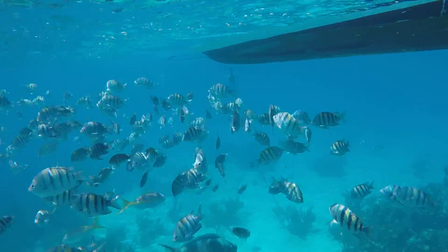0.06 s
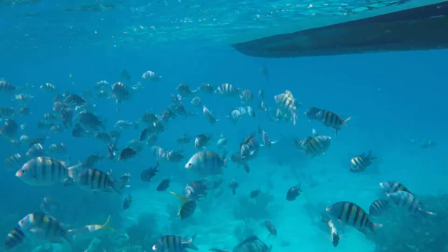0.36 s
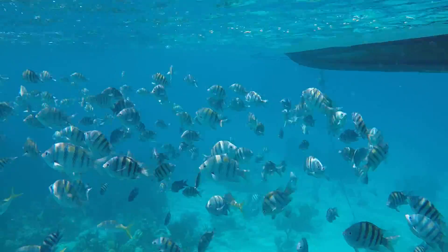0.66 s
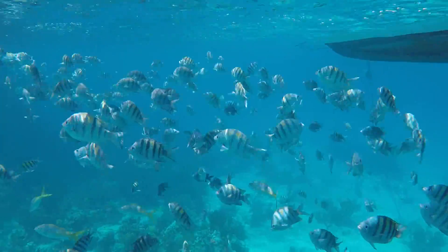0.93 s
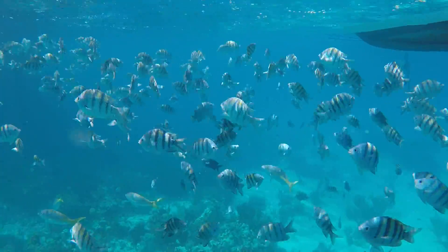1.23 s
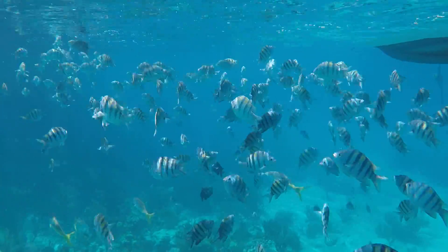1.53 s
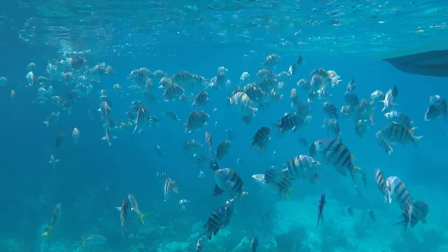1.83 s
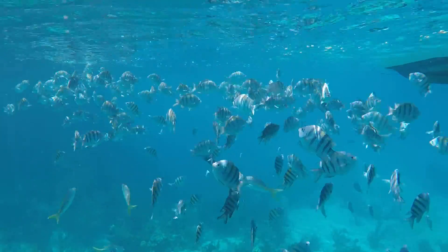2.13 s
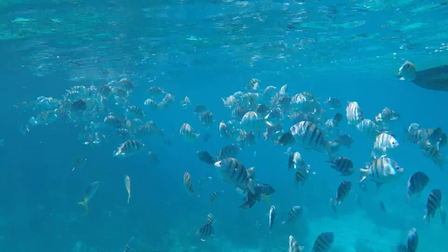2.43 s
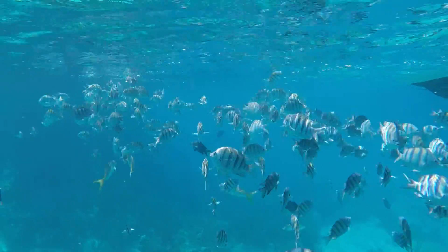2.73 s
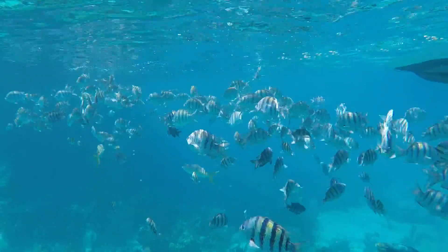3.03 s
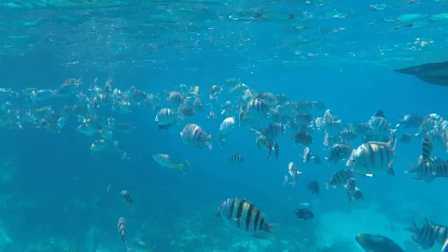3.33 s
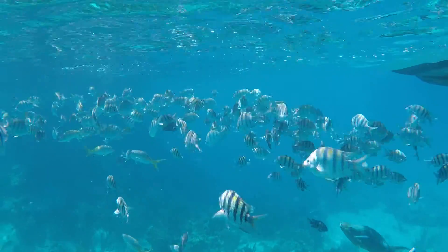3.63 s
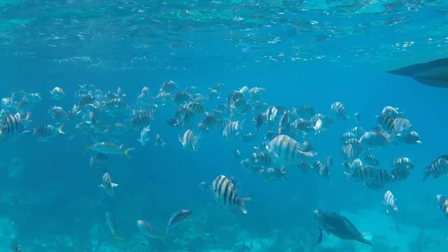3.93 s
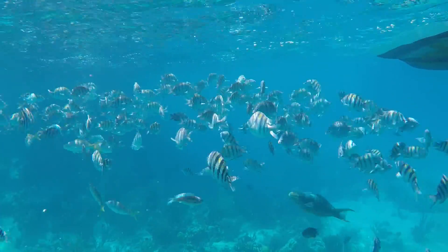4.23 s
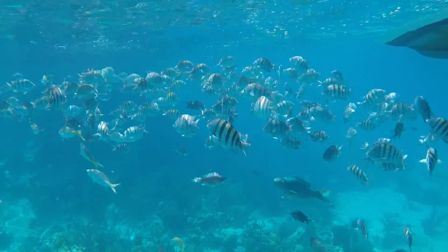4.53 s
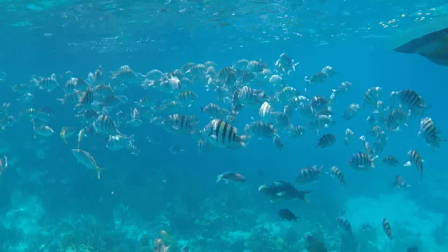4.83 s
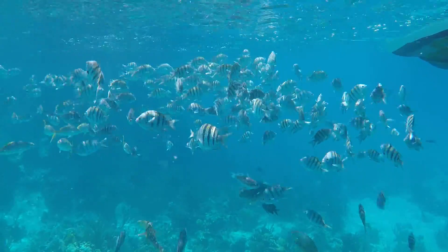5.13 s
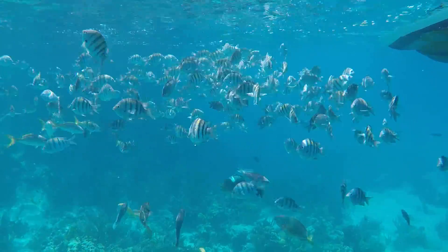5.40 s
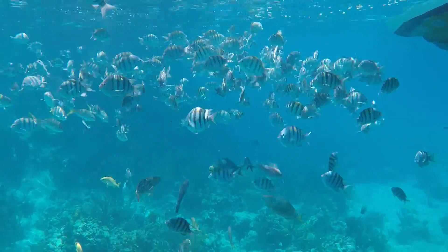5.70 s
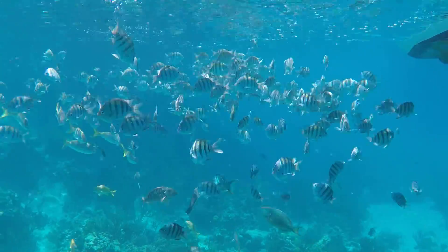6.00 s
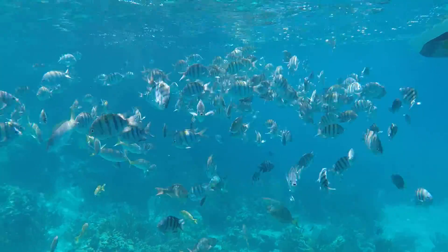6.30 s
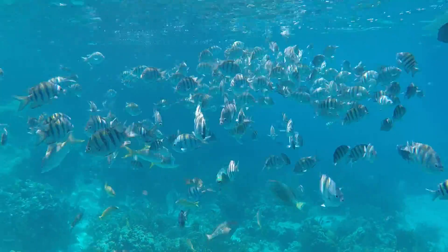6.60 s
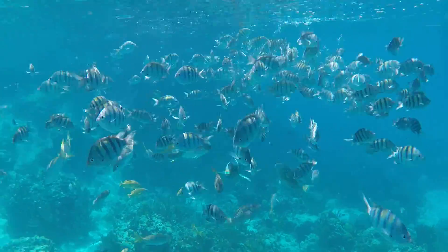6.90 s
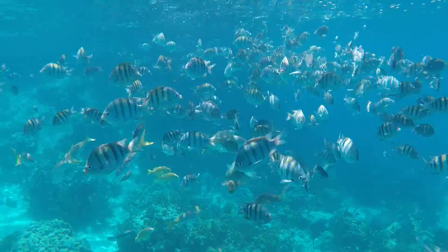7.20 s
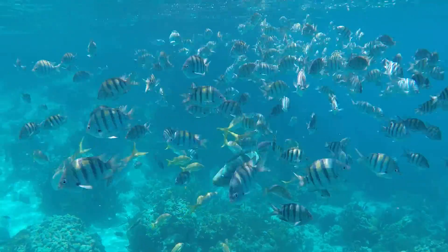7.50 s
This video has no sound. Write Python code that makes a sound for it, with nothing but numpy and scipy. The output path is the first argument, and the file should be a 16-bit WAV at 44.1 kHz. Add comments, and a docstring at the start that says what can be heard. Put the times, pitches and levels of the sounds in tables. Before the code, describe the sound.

Underwater at a coral reef, snapping shrimp crackle all around, with a few sharp clicks close by, over faint slosh and a low rumble. Short, high, fluttering squeaks come three to four a second in three runs, the last one longest and loudest. A few bubbles plop, two of them clearly, and small knocks and scuffs bump the waterproof housing around the microphone.

```python
"""Coral reef under water

Heard through a camera's waterproof housing. Snapping shrimp crackle all around, a few close by, as their
cavities collapse. Bubbles plop; small knocks and scuffs ring the housing. Runs of short fluttering
squeaks, like air forced through a wet seal, sound over slosh and a low rumble."""
import sys
import numpy as np
from scipy import signal
from scipy.fft import rfft, irfft
from scipy.io import wavfile

SR = 44100
rng = np.random.default_rng(int(sys.argv[2]) if len(sys.argv) > 2 else 0)


def transcribe(signal):
    """Save signal, clipped to [-1, 1], as a 16-bit WAV file at the path in sys.argv[1]."""
    frames = np.atleast_2d(signal).T
    limited = np.clip(frames, -1, 1)
    pcm = np.round(limited * 32767).astype(np.int16)
    wavfile.write(sys.argv[1], SR, pcm)


N = 332955


def amp(db):
    """Decibels to gain."""
    return 10 ** (np.asarray(db) / 20)


def unit(x):
    """Scale to rms 1."""
    return x / np.sqrt(np.mean(x ** 2) + 1e-20)


def spread_over(x, seconds):
    """Scale to the energy of rms 1 held for that long."""
    return x * np.sqrt(seconds * SR / np.sum(x ** 2))


def spectrum_db(points, hz):
    """Interpolate (freq_hz, level_db) points on a log-frequency axis."""
    freq_hz, level_db = np.transpose(points)
    return np.interp(np.log(hz + 1), np.log(freq_hz), level_db)


def curve_db(points):
    """Interpolate (time_s, level_db) points at every sample."""
    return np.interp(np.arange(N) / SR, *np.transpose(points))


def add(mix, start_s, sound):
    """Mix a sound in at start_s."""
    part = mix[max(round(start_s * SR), 0):][:len(sound)]
    part += sound[:len(part)]


def noise(colour):
    """Steady noise with the given spectrum, rms 1."""
    gain = amp(spectrum_db(colour, np.fft.rfftfreq(N, 1 / SR)))
    return unit(irfft(rfft(rng.standard_normal(N)) * gain, N))


def swells(rate_hz):
    """Scene-long slow random motion, rms 1."""
    hz = np.fft.rfftfreq(N, 1 / SR)
    return unit(irfft(rfft(rng.standard_normal(N)) * np.exp(-(hz / rate_hz) ** 2), N))


def wobble(rate_hz, size):
    """Short random wavering, rms about 1."""
    lowpass = signal.butter(2, rate_hz, fs=SR, output="sos")
    return unit(signal.sosfilt(lowpass, rng.standard_normal(SR // 2)))[-size:]


def scattered(per_s, values):
    """One random time per equal slot, each with that many random values in 0..1."""
    draws = rng.random((int(per_s * N / SR) + 1, 1 + values))
    return [((slot + place) / per_s, *rest) for slot, (place, *rest) in enumerate(draws)]


# Rumble spectrum: freq_hz, density_db
RUMBLE_SPECTRUM = [(8, -4.5), (22, 5.5), (40, 0), (62, -3.5), (80, -11.5), (130, -21.5), (300, -50)]
# Rumble envelope: time_s, level_db
RUMBLE_ENVELOPE = [(0.0, -51.5), (0.6, -52), (1.15, -54), (2.4, -55), (2.8, -50), (3.15, -58.5),
                   (3.45, -55), (3.7, -56.5), (5.74, -56), (6.04, -52.5), (7.54, -54.5)]


def rumble(eddies_db, gain_db=2.5):
    """Moving water rumbles, swelling with the eddies."""
    return amp(curve_db(RUMBLE_ENVELOPE) + gain_db + eddies_db) * noise(RUMBLE_SPECTRUM)


# Slosh spectrum: freq_hz, density_db
SLOSH_SPECTRUM = [(90, 1.5), (180, 4.5), (300, -3.5), (450, 2), (620, -2), (800, -26.5), (1150, -43.5)]
# Slosh envelope: time_s, level_db
SLOSH_ENVELOPE = [(0.0, -70.5), (1.14, -59), (1.58, -69), (2.54, -69), (2.88, -70.5), (3.43, -60.5),
                  (3.85, -69), (5.25, -67), (5.59, -58.5), (6.08, -61.5), (6.25, -63.5), (7.55, -71)]


def slosh(eddies_db, gurgle_db=3):
    """The surface sloshes with the eddies and gurgles on top."""
    level_db = curve_db(SLOSH_ENVELOPE) + eddies_db / 2 + gurgle_db * swells(rate_hz=20)
    return amp(level_db) * noise(SLOSH_SPECTRUM)


# Far reef spectrum: freq_hz, density_db
WASH_SPECTRUM = [(90, -6.5), (160, -3.5), (320, -10), (500, -11), (635, 3.5), (760, -7), (1150, -15.5),
                 (1580, -10.5), (2200, -19), (3800, -13), (6400, -26.5), (9700, -18.5), (11200, -25.5),
                 (15000, -29)]


def reef_wash(level_db=-63.5, shimmer_db=3):
    """The farthest snaps merge into a restless wash."""
    return amp(level_db + shimmer_db * swells(rate_hz=44)) * noise(WASH_SPECTRUM)


# Snap spectrum through the housing: freq_hz, gain_db
SNAP_SPECTRUM = [(150, -75), (620, -11), (900, -12), (1100, -27), (1300, -15.5), (1540, 6.5), (1720, -0.5),
                 (1900, 4.5), (3000, -0.5), (5600, -8.5), (6500, -16), (9500, -18), (11200, -22.5),
                 (13500, -19)]


def snap(tilt, ring_hz=3000, ring_db=0, ring_octaves=0.15, scatter_db=-5, scatter_t60_s=0.011,
         tail_db=-11, tail_t60_s=0.074, tail_hz=4200, size=4096):
    """A cavity collapses: ringing crack, quick echoes off surface and housing, dull tail from the reef."""
    hz, t = np.fft.rfftfreq(size, 1 / SR), np.arange(size) / SR
    peak_db = ring_db / (1 + (np.log2((hz + 1) / ring_hz) / ring_octaves) ** 2)
    log_gain = np.log(amp(spectrum_db(SNAP_SPECTRUM, hz) + spectrum_db(tilt, hz) + peak_db))
    mirrored = np.r_[log_gain, log_gain[-2:0:-1]]
    crack = np.exp(np.conj(signal.hilbert(mirrored)))[:len(hz)]  # minimum phase
    quick, late = rng.standard_normal((2, size)) * (t > .0002)
    quick = quick * abs(quick) * amp(-60 * t / scatter_t60_s)
    late = late * amp(-60 * t / tail_t60_s)
    tail = rfft(late / np.linalg.norm(late)) * 2 / (1 + 1j * hz / tail_hz) ** 2
    paths = 1 + amp(scatter_db) * rfft(quick / np.linalg.norm(quick)) + amp(tail_db) * tail
    return spread_over(irfft(paths * crack, size), 0.025)


def crackle(per_s, spread_db, low_hz, high_hz, skirt_db, ring_db, tail_hz, bands=24):
    """Many small snaps of unequal size, each coloured by its own pitch; rms 1."""
    out = np.zeros(N)
    for hz in np.geomspace(low_hz, high_hz, bands):
        nearness = np.minimum(rng.exponential(1, N), 2.6)
        impulses = amp(spread_db * nearness) * (rng.random(N) < per_s / bands / SR)
        tilt = [(hz / 2, skirt_db), (hz, 0), (hz * 2, skirt_db)]
        tick = snap(tilt, hz, ring_db, scatter_db=-7, scatter_t60_s=0.0074,
                    tail_db=-6, tail_t60_s=0.082, tail_hz=tail_hz)
        out += signal.oaconvolve(impulses, tick)[:N]
    return unit(out)


def shrimp_bed(ticks_db=-67, fizz_db=-66):
    """Far shrimp crackle all over the reef: full ticks and a fine bright fizz."""
    ticks = crackle(per_s=110, spread_db=4, low_hz=1985, high_hz=8000,
                    skirt_db=-8, ring_db=8.5, tail_hz=5450)
    fizz = crackle(per_s=135, spread_db=9.5, low_hz=6600, high_hz=15660,
                   skirt_db=-9.5, ring_db=15.5, tail_hz=10500)
    return amp(ticks_db) * ticks + amp(fizz_db) * fizz


# Loudest distant snaps: start_s, level_db
DISTANT_SNAPS = [(0.867, -51.5), (0.922, -52), (1.309, -50), (3.028, -53), (3.134, -50), (3.577, -52),
                 (4.25, -54.5), (4.308, -53.5), (5.583, -52), (6.170, -51.5), (6.727, -54)]


def distant_shrimp(gain_db=3, swell_s=0.0043, faint_per_s=1.5, faint_db=-57, spread_db=5, size=3000):
    """Snaps arriving by many paths smear into short dull scratches; faint ones fall at random."""
    out = np.zeros(N)
    age = np.arange(size) / SR / swell_s
    faint = [(start_s, faint_db + spread_db * (strength - .5))
             for start_s, strength in scattered(faint_per_s, values=1)]
    for start_s, level_db in DISTANT_SNAPS + faint:
        paths = rng.standard_normal(size) ** 3 * age * np.exp(-age)
        scratch = signal.fftconvolve(paths, snap([(1800, 1), (3400, 2), (7000, -3)]))
        add(out, start_s - .002, amp(level_db + gain_db) * spread_over(scratch, 0.01))
    return out


def near_snap(ring_hz, treble_db):
    """One close snap: the higher it rings, the thinner its body."""
    body_db = -4.5 - 5.5 * np.log2(ring_hz / 2950)
    tilt = [(1800, body_db), (3400, 0), (10000, treble_db)]
    return snap(tilt, ring_hz, ring_db=7, scatter_db=-1, tail_db=-9.5)


# Loudest close snaps: start_s, level_db, ring_hz, treble_db
NEAR_SNAPS = [(0.1388, -43.5, 4360, 6), (0.411, -35, 2980, -13), (0.4328, -51, 3650, -4),
              (0.67, -51, 3000, -1), (0.684, -42, 5860, -0.5), (0.794, -52, 2600, 0),
              (0.984, -40.5, 2040, -1), (1.0056, -46.5, 3520, -6), (1.2458, -44, 3780, -16),
              (1.3744, -53.5, 4060, 3), (1.9647, -56.5, 9000, 14), (2.0671, -44.5, 7550, 1.5),
              (2.4618, -53.5, 2820, 0), (2.7415, -55.5, 3680, 13), (2.8203, -47.5, 3500, -3),
              (2.849, -55.5, 4530, 15), (3.7217, -61, 10100, 19), (3.8339, -49.5, 5640, 3),
              (3.9104, -47.5, 5830, -12), (4.042, -59.5, 8950, 21), (4.6013, -42.5, 3340, 4.5),
              (4.707, -38.5, 3400, -32), (4.8961, -45, 3940, 5.5), (4.9614, -54, 2650, 10),
              (5.3266, -54, 7100, 13), (5.6827, -54, 3440, 8), (5.7718, -53, 4170, 0),
              (6.0478, -39.5, 4450, -5), (6.0628, -52, 2670, 19), (6.3737, -44, 3000, -2.5),
              (6.8926, -40.5, 3130, 3), (7.0107, -51.5, 4570, 13)]


def near_shrimp(gain_db=1, faint_per_s=2.1, faint_db=-56, spread_db=4, low_hz=2700, high_hz=9000):
    """Close shrimp: loud snaps, with faint bright ones at random between them."""
    out = np.zeros(N)
    for start_s, level_db, ring_hz, treble_db in NEAR_SNAPS:
        add(out, start_s, amp(level_db + gain_db) * near_snap(ring_hz, treble_db))
    for start_s, strength, pitch in scattered(faint_per_s, values=2):
        level_db = faint_db + spread_db * (strength - .5)
        ring_hz = low_hz * (high_hz / low_hz) ** pitch
        add(out, start_s, amp(level_db) * near_snap(ring_hz, treble_db=8))
    return out


# Housing modes: freq_hz, gain_db, t60_s
HOUSING_MODES = [(221, -5, 0.016), (328, -3.5, 0.023), (519, -2.5, 0.026), (627.6, 3, 0.04),
                 (814, -2.5, 0.042), (920, -33, 0.2), (1546, -1.5, 0.036), (1860, 0, 0.033)]


def knock(level_db, blow_hz, click_db, click_gain_db=4, rise_s=0.0016, detune=0.063, octave_off_db=-4.5):
    """A short push rings the housing modes near its own pitch, with a click of contact."""
    t = np.arange(SR // 10) / SR
    out = np.zeros(len(t))
    for freq_hz, gain_db, t60_s in HOUSING_MODES:
        swing = np.sin(2 * np.pi * freq_hz * (1 + detune * rng.standard_normal()) * t)
        ring = swing * amp(-60 * t / t60_s) * (1 - np.exp(-(t / rise_s) ** 2))
        drive_db = octave_off_db * np.log2(freq_hz / blow_hz) ** 2
        out += amp(level_db + gain_db + drive_db) * spread_over(ring, 0.018)
    click = snap([(1800, -4), (3400, -4)], scatter_db=8, tail_db=-5.5)
    add(out, 0, amp(click_db + click_gain_db) * click)
    return out


# Scuffs on the housing: start_s, length_s, level_db, blow_hz, click_db
HOUSING_SCUFFS = [(2.363, 0.203, -53.5, 770, -61.5), (5.154, 0.017, -47.5, 1360, -70)]


def scuffs(slips_per_s=42, jitter_s=0.0026, ends_db=-2, uneven_db=2, wander_octaves=0.8):
    """Something slips across the housing in uneven little knocks, strongest midway."""
    out = np.zeros(N)
    for start_s, length_s, level_db, blow_hz, click_db in HOUSING_SCUFFS:
        slips = 2 + int(length_s * slips_per_s)
        for progress in np.linspace(0, 1, slips):
            late, pitch, force = rng.standard_normal(3)
            press_db = ends_db * (2 * progress - 1) ** 2 + uneven_db * force
            slip = knock(level_db + press_db, blow_hz * 2 ** (wander_octaves * pitch), click_db + press_db)
            add(out, start_s + progress * length_s + jitter_s * late, slip)
    return out


# Knocks on the housing: start_s, level_db, blow_hz, click_db
HOUSING_KNOCKS = [(1.1553, -39, 150, -82), (4.346, -43, 433, -62), (4.408, -46.5, 1200, -57),
                  (4.501, -39.5, 780, -47.5), (4.709, -45.5, 1410, -58), (5.025, -46, 90, -66),
                  (6.5696, -45.5, 920, -49.5), (6.767, -40, 1240, -49.5)]


def knocks():
    """Single bumps on the housing, from soft thuds to hard taps."""
    out = np.zeros(N)
    for start_s, level_db, blow_hz, click_db in HOUSING_KNOCKS:
        add(out, start_s, knock(level_db, blow_hz, click_db))
    return out


# Bubble plops: start_s, peak_db, pitch_hz
PLOPS = [(1.272, -40.5, 610), (2.1459, -26.5, 609), (4.209, -47, 616), (4.737, -45, 557),
         (4.8496, -20.5, 602), (5.366, -41.5, 624)]


def bubbles(rise_s=0.0024, t60_s=0.028, glide_per_s=7):
    """A pocket of air swells into a round ring and rises a little in pitch."""
    out, t = np.zeros(N), np.arange(SR // 20) / SR
    envelope = (1 - np.exp(-(t / rise_s) ** 3)) * amp(-60 * t / t60_s)
    envelope /= envelope.max()
    for start_s, peak_db, pitch_hz in PLOPS:
        phase = 2 * np.pi * pitch_hz * t * (1 + glide_per_s * t / 2)
        add(out, start_s, amp(peak_db) * envelope * np.sin(phase))
    return out


def reef_echo(dry, wet_db=-28, t60_s=0.16, size=4096):
    """Add faint scatter off sand, coral and surface."""
    paths = rng.standard_normal(size) * amp(-60 * np.arange(size) / SR / t60_s)
    return dry + amp(wet_db) * signal.oaconvolve(dry, paths / np.linalg.norm(paths))[:N]


def squeak(length_s, pitch_hz, glide_hz, flutter_hz, rise_s=0.012, fade_share=0.46,
           slack_hz=2290, steadying_hz=51.3, slack_flutter_db=10, first_pulse_s=0.0088, slowing=0.27,
           stutter_db=1.5, stutter_s=0.006, rasp_db=0.37, scoop_hz=90, scoop_s=0.0053, droop_hz=55,
           bend_hz_per_db=5, waver_hz=15, second_db=-32.5, third_db=-39, overtone_rasp_db=4):
    """A seal-like whistle scoops up, glides and droops; flutter lifts pitch and level together."""
    t = np.arange(round(length_s * SR)) / SR
    progress = t / length_s
    drift, lag, grit, overtone_grit = (wobble(rate_hz, len(t)) for rate_hz in (50, 40, 260, 400))
    # A slacker seal whistles lower, flutters deeper and shuts later, more abruptly.
    slack = np.exp(min(slack_hz - pitch_hz, 0) / steadying_hz)
    fade = np.clip((1 - progress) / fade_share / (1 - 0.58 * slack), 0, 1)
    rate_hz = flutter_hz * (1 - slowing * progress + 0.096 * lag)
    cycles = np.cumsum(rate_hz) / SR - flutter_hz * first_pulse_s
    opening_db = stutter_db * np.exp(-t / stutter_s)
    depth_db = slack_flutter_db * slack * np.sqrt(fade) + opening_db
    flutter_db = depth_db * np.cos(2 * np.pi * cycles) + (rasp_db + opening_db / 2) * grit
    attack = np.sin(np.pi / 2 * np.minimum(t / rise_s, 1)) ** 2
    flow = attack * np.sin(np.pi / 2 * fade) * amp(flutter_db)
    contour_hz = glide_hz * progress - droop_hz * (1 - fade) ** 2 - scoop_hz * np.exp(-t / scoop_s)
    bend_hz = contour_hz + bend_hz_per_db * flutter_db + waver_hz * drift
    phase = 2 * np.pi * np.cumsum(pitch_hz + bend_hz - np.average(bend_hz, weights=flow ** 2)) / SR
    overtones = amp(second_db) * np.sin(2 * phase) + amp(third_db) * np.sin(3 * phase)
    tone = np.sin(phase) + overtones * unit(amp(overtone_rasp_db * overtone_grit))
    body_rms = np.sqrt(np.mean(flow[progress < .65] ** 2) / 2)
    return flow * tone / body_rms


# Squeaks: start_s, length_s, level_db, mean_pitch_hz, glide_hz, initial_flutter_hz
SQUEAK_RUNS = [(0.293, 0.086, -35, 2387, -9, 75), (0.545, 0.056, -41, 2422, -80, 80),
               (0.819, 0.1, -38.5, 2432, 62, 45), (1.154, 0.096, -37.5, 2386, 136, 42),
               (1.453, 0.05, -48, 2430, -2, 45), (3.081, 0.068, -41, 2443, -39, 36),
               (3.368, 0.079, -38.5, 2388, 27, 77), (3.651, 0.066, -44.5, 2356, 46, 45.3),
               (4.647, 0.082, -33.5, 2370, 82, 71.5), (4.91, 0.1, -32.5, 2365, 94, 82),
               (5.2, 0.045, -36.5, 2398, 2, 40), (5.463, 0.074, -31, 2410, -16, 116),
               (5.723, 0.095, -30, 2350, 55, 137.4), (6.0028, 0.1, -31.7, 2340, 49, 121),
               (6.288, 0.11, -33.5, 2286, 16, 52.8), (6.588, 0.1, -31, 2303, 70, 62.4),
               (6.869, 0.088, -32, 2398, 71, 49.7), (7.121, 0.068, -31.5, 2394, -10, 108),
               (7.376, 0.051, -33.5, 2472, 40, 46)]


def squeaks():
    """Three runs of squeaks, three to four a second, like air forced through a wet seal."""
    out = np.zeros(N)
    for start_s, length_s, level_db, pitch_hz, glide_hz, flutter_hz in SQUEAK_RUNS:
        add(out, start_s, amp(level_db) * squeak(length_s, pitch_hz, glide_hz, flutter_hz))
    return out


def scene():
    """All sources sum at one microphone inside the housing."""
    shrimp = near_shrimp() + distant_shrimp() + shrimp_bed()
    foreground = knocks() + scuffs() + bubbles() + reef_echo(squeaks())
    eddies_db = 2 * swells(rate_hz=11)
    water = rumble(eddies_db) + slosh(eddies_db) + reef_wash()
    return (water + shrimp + foreground)[None]


def record(dry, cutoff_hz=15450):
    """Steep low-pass band limit."""
    lowpass = signal.firwin(255, cutoff_hz, window=("kaiser", 8), fs=SR)
    return signal.oaconvolve(dry, lowpass[None], "same")


dry = scene()
out = record(dry)
transcribe(out)
```